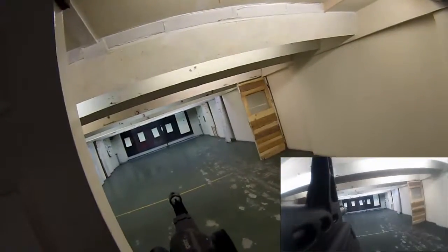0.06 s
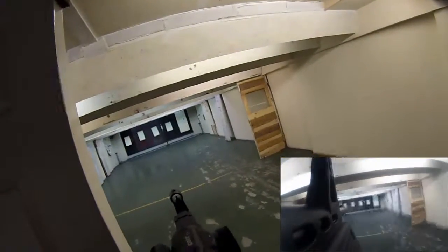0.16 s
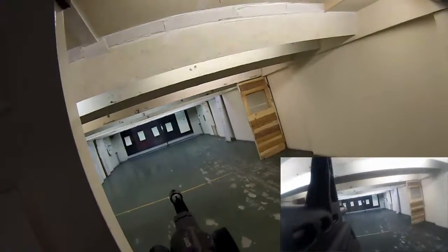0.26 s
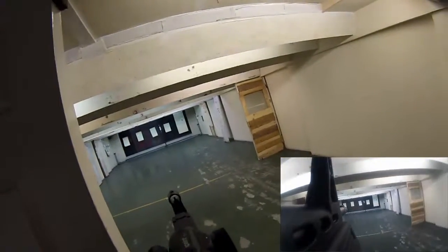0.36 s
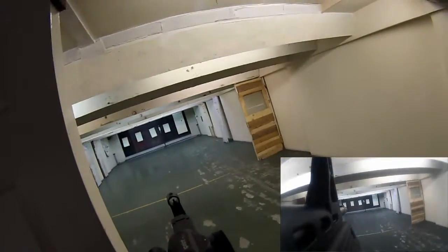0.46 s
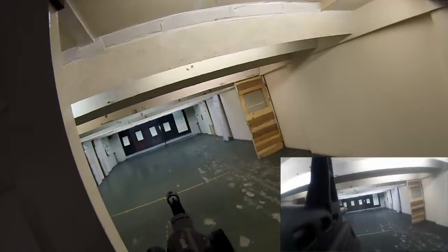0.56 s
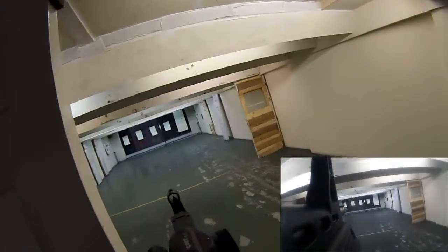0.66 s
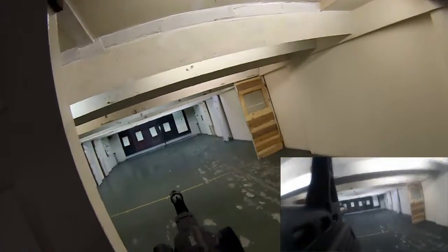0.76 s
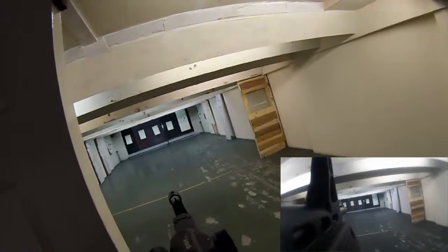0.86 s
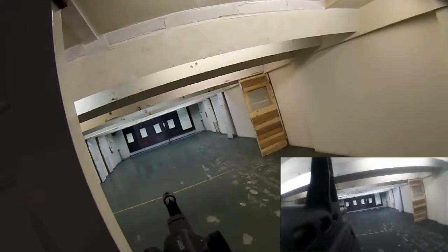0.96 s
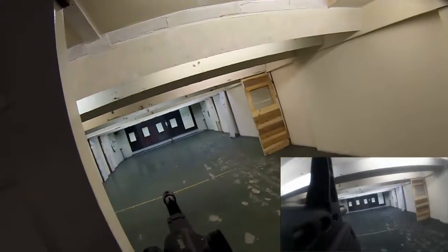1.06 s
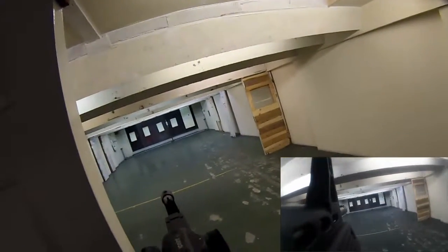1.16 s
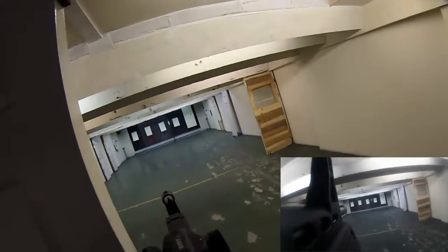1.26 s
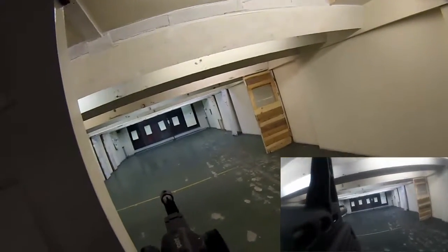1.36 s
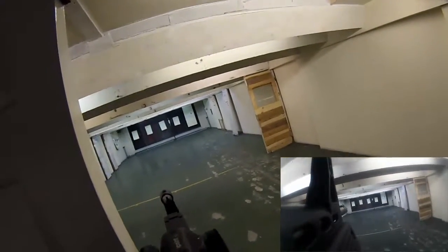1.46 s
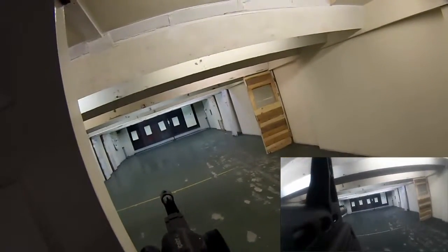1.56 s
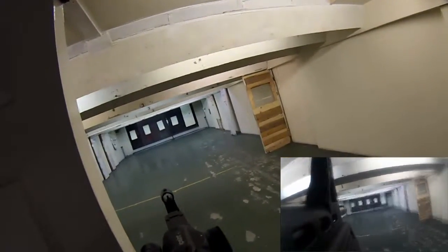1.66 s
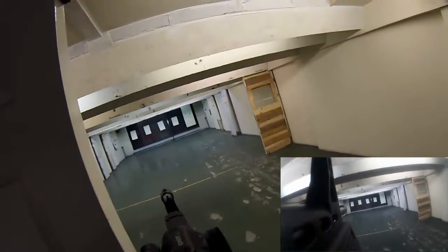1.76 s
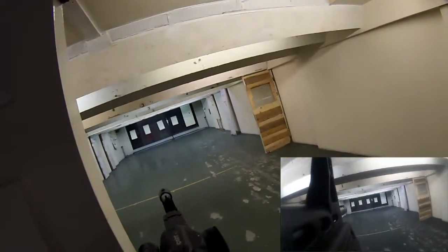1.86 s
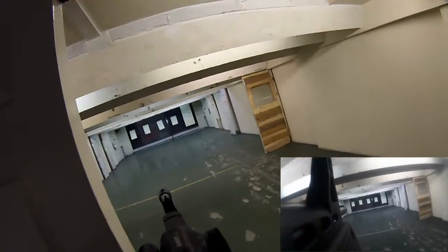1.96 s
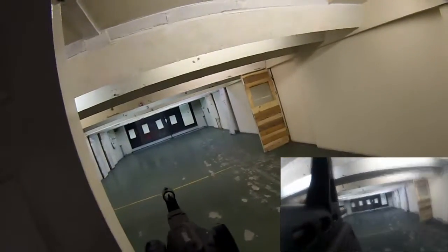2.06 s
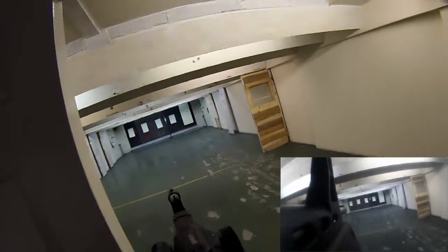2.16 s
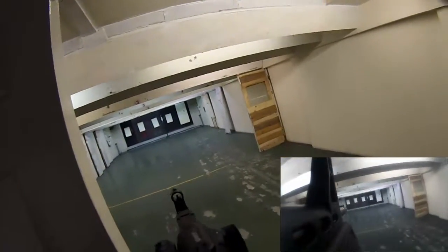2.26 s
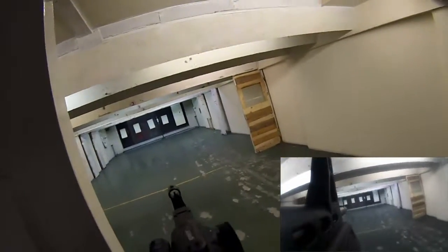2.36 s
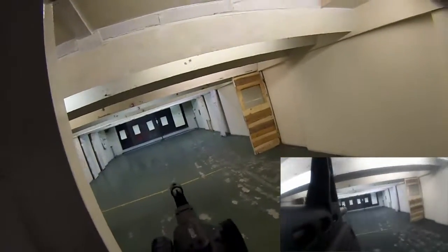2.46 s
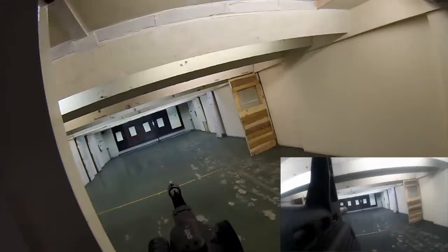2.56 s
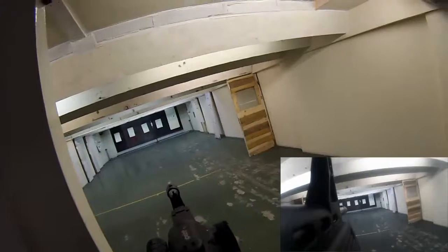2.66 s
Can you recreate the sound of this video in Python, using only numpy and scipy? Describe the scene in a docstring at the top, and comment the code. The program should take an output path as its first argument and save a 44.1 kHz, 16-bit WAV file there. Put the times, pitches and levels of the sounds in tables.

```python
"""Rifle shots in an indoor range

Four shots in a concrete hall, heard from a camera worn by the shooter, with trigger clicks, spent cases and air.
Shaped noise bursts make each blast, its slaps off near walls and far echoes; fading noise and sines make the hall.
The camera's limiter ducks at every shot and recovers about as fast as the hall fades,
so the roar holds before it dies."""
import sys
import numpy as np
from scipy import signal
from scipy.fft import rfft, irfft
from scipy.io import wavfile
from scipy.ndimage import uniform_filter1d, minimum_filter1d

SR = 44100
rng = np.random.default_rng(int(sys.argv[2]) if len(sys.argv) > 2 else 0)


def persist_wave(psi):
    """Save psi, clipped to +-1, as 16-bit WAV."""
    counts = np.round(np.clip(psi, -1, 1) * 32767).astype(np.int16)
    wavfile.write(sys.argv[1], SR, np.atleast_2d(counts).T)


N = 121275
T = np.arange(N) / SR  # time in s

# Relative spectral density of the hall's reflections: f/Hz, density/dB (per Hz)
HALL_SPECTRUM = [(18, -105), (30, -27), (82, -29), (120, -19), (191, -21.5), (235, -16.5), (274, -18),
                 (363, -14), (435, -8), (470, -10), (709, -2), (1040, -3.5), (1250, -8.5), (1530, -8),
                 (1880, -1.5), (2700, -12.5), (3230, -9.5), (3870, -17), (5010, -17), (5990, -22),
                 (6810, -20), (7950, -25.5), (14000, -37)]
HALL_BUILD_S = 0.0066  # time constant of the hall's build-up
LEAD_S = 0.0026  # the rifle's own jolt comes this long before the blast


def amp(db):
    """Amplitude ratio of a level: 20 dB is a factor of ten."""
    return 10 ** (np.asarray(db) / 20)


def unit(x):
    """Normalisation: the sum of squares becomes 1."""
    return x / np.sqrt(np.sum(x ** 2) + 1e-20)


def read(points, hz):
    """Interpolation of a table on a logarithmic frequency axis."""
    f, value = np.transpose(points)
    return np.interp(np.log(hz + 1), np.log(f + 1), value)


def add(mix, s, sound):
    """Superposition: a sound is added in place from time s."""
    part = mix[round(s * SR):][:len(sound)]
    part += sound[:len(part)]


def colour(x, points, tilt_db=0, size=4096):
    """Minimum-phase filter of energy 1: the log gain fixes the phase. Tilt in dB per octave."""
    hz = abs(np.fft.fftfreq(size, 1 / SR))
    gain_db = read(points, hz) + tilt_db * np.log2((hz + 50) / 1000)
    log_gain = np.log(amp(gain_db))
    spectrum = np.exp(np.conj(signal.hilbert(log_gain)))
    taps = np.fft.ifft(spectrum).real[:size // 2]
    return signal.oaconvolve(x, unit(taps))[:len(x)]


def flat(x):
    """Whitening: equal magnitudes at all frequencies, so that a burst's colour is not left to chance."""
    z = rfft(x)
    return unit(irfft(z / (abs(z) + 1e-12), len(x)))


def burst(envelope):
    """White noise of energy 1, shaped in time and whitened by turns."""
    x = rng.standard_normal(len(envelope)) * envelope
    for _ in range(4):
        x = flat(x) * np.sqrt(envelope)
    return unit(x)


def blend(shared, own, change):
    """Constant-power mix: change is the share of power that the fresh sound takes."""
    return np.sqrt(1 - change) * shared + np.sqrt(change) * own


def ventilation():
    """Broadband flow noise: a quiet steady rush of air from filtered white noise."""
    # Relative spectral density of the air: f/Hz, density/dB (per Hz)
    air_spectrum = [(30, -10), (100, 0), (250, -7.5), (450, -6.5), (680, -4), (850, -7), (1050, -13),
                    (1400, -14), (2200, -16.5), (4000, -21), (8000, -26), (14000, -32)]
    return amp(-61.5) * colour(rng.standard_normal(N), air_spectrum)


def hall_tail():
    """Diffuse reverberation: dense reflections build up, then decay exponentially band by band."""
    # Reverberation time, for a fall of 60 dB: f/Hz, T60/s
    decay_times = [(60, 1.25), (260, 1.104), (700, 1.32), (1100, 1.524), (1900, 1.313), (3300, 1.338),
                   (5000, 1.22), (8000, 0.88), (13000, 1.055)]
    hz, t, z = signal.stft(rng.standard_normal(N), SR, nperseg=512)
    decay = amp(-60 * t / read(decay_times, hz)[:, None])
    tail = signal.istft(z * decay, SR, nperseg=512)[1][:N]
    return unit(colour(tail, HALL_SPECTRUM) * (1 - np.exp(-T / HALL_BUILD_S)))


def action(tail, size=2048):
    """Impact noise: short clicks of trigger and hammer, convolved with the tail for a little of the hall."""
    # Clicks: t/s, level/dB, tilt/(dB per octave)
    clicks = [(.0535, -20.5, -4), (.0565, -27, -2.5), (.1718, -15, -3.5), (0.1743, -18, -4),
              (0.1927, 2, -4), (.196, 7.5, 0), (1.689, -8, 0.5), (2.068, 1, 2)]
    # Relative spectral density of the rifle's mechanism: f/Hz, density/dB (per Hz)
    action_spectrum = [(60, -42), (250, -26), (400, -18), (620, -6), (860, -3), (1030, 3), (1200, -1),
                       (1450, -11), (2300, -23), (3500, -29), (7000, -38), (14000, -48)]
    out = np.zeros(N)
    envelope = np.exp(-T[:size] / 0.0013)
    for s, db, bright_db in clicks:
        add(out, s, amp(db) * colour(burst(envelope), action_spectrum, tilt_db=bright_db))
    return out + amp(-12.5) * signal.fftconvolve(out, tail)[:N]


def shock(smear_s, size=2048):
    """Impulse and scattering: a pressure jump, then a fading smear off nearby things."""
    scatter = 2.86  # amplitude relative to the jump
    fade = np.exp(-T[:size] / smear_s)
    jump = signal.unit_impulse(size)
    return unit(flat(jump + scatter * burst(fade)) * fade ** (1 / 4))


def crack(size=8192):
    """Image sources: the rifle's jolt, the muzzle blast and its delayed reflections, with escaping-gas hiss."""
    # Blast paths, direct and off booth, floor and ceiling: delay/s, level/dB, smear/s
    paths = [(0, -1.5, 0.0015), (.0035, -13, 0.0045), (.0077, 0.5, 0.0014), (.0123, -15, .001),
             (0.0154, -27, 0.0042), (0.0217, -26, .0006), (.0283, -16.5, 0.00037)]
    # Relative spectral density of the blast: f/Hz, density/dB (per Hz)
    blast_spectrum = [(30, -27), (100, -16.5), (160, -3), (330, -4), (520, 0), (780, 1.5), (1100, -3),
                      (1350, -4), (1700, -3), (2100, 3), (2700, -7.5), (3100, -2), (3900, -7.5),
                      (5100, -15.5), (6400, -12), (7500, -20.5), (10000, -22), (14000, -30)]
    hiss_peak_s, hiss_width_s = 0.0068, 0.0055
    impulses = np.zeros(size)
    add(impulses, 0, amp(-15.5) * shock(0.003))  # the jolt
    for s, db, smear_s in paths:
        add(impulses, LEAD_S + s, amp(db) * shock(smear_s))
    hiss = burst(np.exp(-((T[:size] - hiss_peak_s) / hiss_width_s) ** 2))
    blast = amp(27) * colour(impulses, blast_spectrum)
    return blast + amp(16.5) * colour(hiss, blast_spectrum, tilt_db=3)


def hall_answer(size=8192):
    """Early reflections and room modes: side walls, far echoes and decaying standing waves."""
    # Broad echoes from down the range: delay/s, level/dB, spread/s
    echo_arrivals = [(0.0891, -2.5, 0.005), (.094, -8, .002)]
    # Relative spectral density of the echoes: f/Hz, density/dB (per Hz)
    echo_spectrum = [(60, -23), (350, -8.5), (720, 1), (1100, 4.5), (1400, -2), (1850, 2), (2400, 5.5),
                     (2800, -20.5), (3300, -7), (4200, -24), (7000, -27), (14000, -37)]
    # Standing waves, levels relative to one another: f/Hz, level/dB
    modes = [(398, -14), (534, -5.5), (728, 3.5), (786, 10), (925, -11.5), (1021, 5.5), (1096, -8),
             (1652, -11.5), (1683, 11), (1776, -36), (1873, 1), (2107, 0.5), (2276, 3.5), (3309, -2.5)]
    walls_s, walls_spread_s = 0.034, 0.0061  # a cluster of side-wall reflections
    modes_db, modes_t60_s = -33, 1.32

    t = T[:size]
    walls = burst(np.exp(-abs(t - walls_s) / walls_spread_s))
    echoes = sum(amp(db) * burst(np.exp(-abs(t - s) / spread_s)) for s, db, spread_s in echo_arrivals)
    out = sum(amp(db) * np.sin(2 * np.pi * (hz * T + rng.random())) for hz, db in modes)
    out *= amp(modes_db - 60 * T / modes_t60_s) * (1 - np.exp(-T / HALL_BUILD_S))
    add(out, 0, amp(16.5) * colour(walls, HALL_SPECTRUM))
    add(out, 0, amp(20.5) * colour(echoes, echo_spectrum))
    return out


def gas_push(size=4096):
    """Blast-wave pulse, low-passed: slow suction and rebound of the muzzle gas at the microphone."""
    u = T[:size] / 0.003  # time in units of the suction's length
    pulse = (1 - u) * np.exp(-u)
    return -amp(7) * signal.lfilter(*signal.butter(2, 101, fs=SR), pulse)  # cutoff 101 Hz


def shots(tail):
    """Fixed source and receiver: the shooter stands still, so all shots share nearly the same reflections."""
    # Shots: t/s, level/dB, added crack level/dB, gas push level/dB
    shot_list = [(0.2011, -2, -1, -6.5), (0.7702, -2.3, 0, -9), (1.6979, 0, 0, 2.5), (2.0802, -1.14, 1, -3)]
    push_delay_s = 0.0051
    blast_change, hall_change = 0.093, 0.15  # shares of power that differ from shot to shot
    out, blast, push, answer = np.zeros(N), crack(), gas_push(), hall_answer()
    for s, db, crack_db, push_db in shot_list:
        add(out, s - LEAD_S, amp(db + crack_db) * blend(blast, crack(), blast_change))
        add(out, s + push_delay_s, amp(push_db) * push)
        reverberation = amp(28) * blend(tail, hall_tail(), hall_change)
        add(out, s, amp(db) * (reverberation + answer))
    return out


def spent_cases(size=8192):
    """Impact excitation: cases land and bounce, faint tinks of brass on concrete from fading noise."""
    # Impacts: t/s, level/dB, nominal ring time/s
    impacts = [(1.353, -23, .02), (1.40, -33, .06), (1.48, -35, .07), (1.63, -36, 0.011),
               (1.652, -40, 0.0094), (2.68, -28, .06)]
    # Relative spectral density of the brass: f/Hz, density/dB (per Hz)
    brass_spectrum = [(1500, -35), (4000, -3), (5200, 8), (6000, -5), (6900, 3), (7900, -9), (10500, -12),
                      (14000, -19)]
    out = np.zeros(N)
    for s, db, ring_s in impacts:
        add(out, s, amp(db) * colour(burst(np.exp(-T[:size] / ring_s)), brass_spectrum))
    return out


def saturate(x, ceiling):
    """Soft clipping: linear when weak, bounded by the ceiling, with a rounded knee."""
    knee = 6  # higher is sharper
    return x / (1 + abs(x / ceiling) ** knee) ** (1 / knee)


def scene():
    """Superposition of shots, rifle handling, spent cases and air, with one hall tail in common."""
    tail = hall_tail()
    return (shots(tail) + action(tail) + spent_cases() + ventilation())[None]


def record(dry):
    """Dynamic compression: microphone overload, look-ahead limiter, clipping and a band limit."""
    threshold_db, recover_db_per_s = -7, 39.5
    look_ahead_s, detect_s = 0.0077, 0.011
    x = saturate(dry[0], amp(13))  # the microphone overloads
    ahead = round(look_ahead_s * SR)

    power = abs(uniform_filter1d(x ** 2, round(detect_s * SR)))
    power_db = 10 * np.log10(power + 1e-12)
    coming_db = -minimum_filter1d(-power_db, 2 * ahead)  # highest level nearby
    # The held level follows rises and falls no faster than the recovery rate
    fall = recover_db_per_s * T
    held_db = np.maximum.accumulate(coming_db + fall) - fall
    over_db = np.maximum(held_db - threshold_db, 0)
    x = saturate(x * amp(-uniform_filter1d(over_db, ahead)), 0.94)

    low_pass = signal.firwin(401, 14230, window=("kaiser", 7), fs=SR)  # cutoff in Hz
    return signal.oaconvolve(x, low_pass, "same")[None]


dry = scene()
out = record(dry)
persist_wave(out)
```